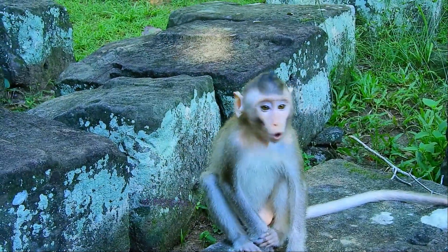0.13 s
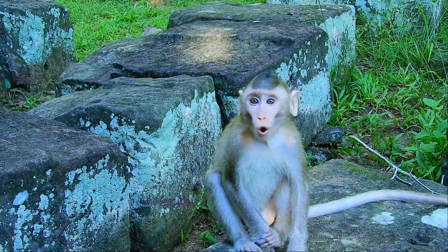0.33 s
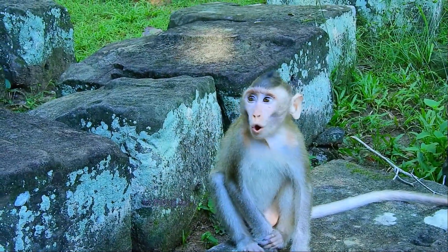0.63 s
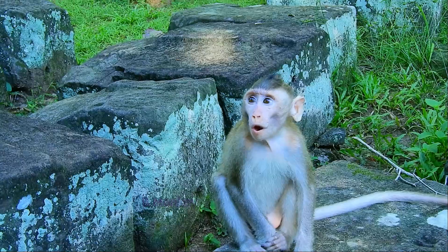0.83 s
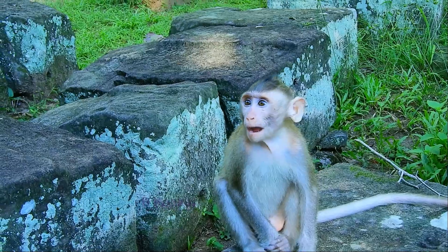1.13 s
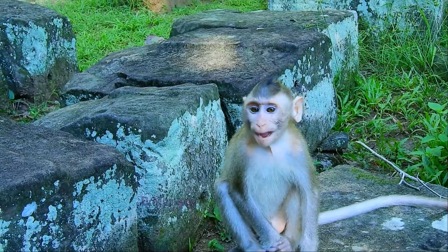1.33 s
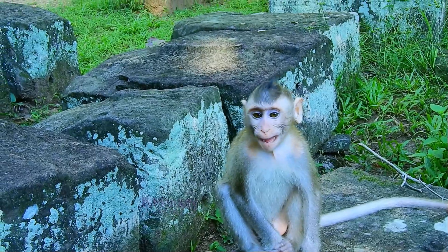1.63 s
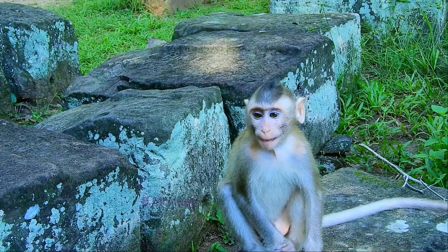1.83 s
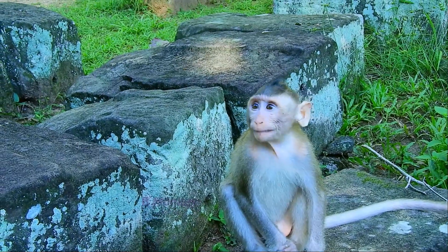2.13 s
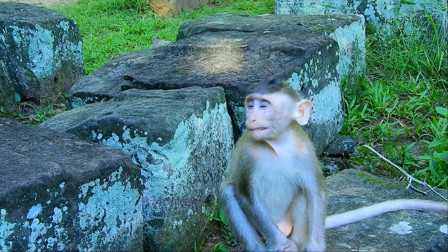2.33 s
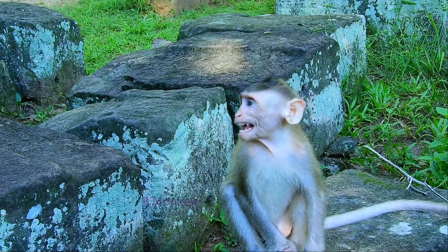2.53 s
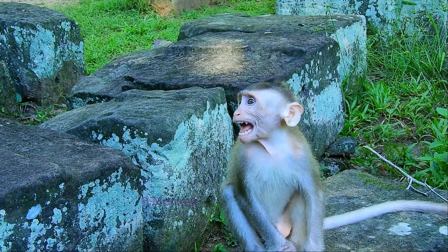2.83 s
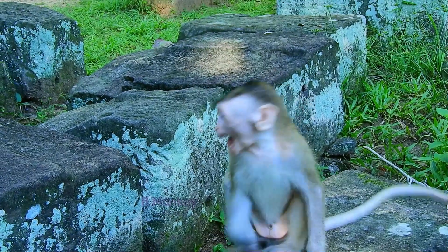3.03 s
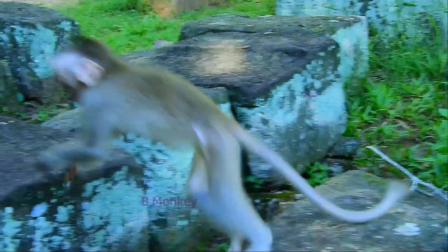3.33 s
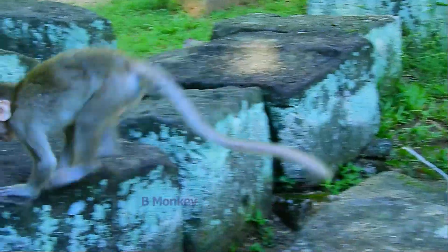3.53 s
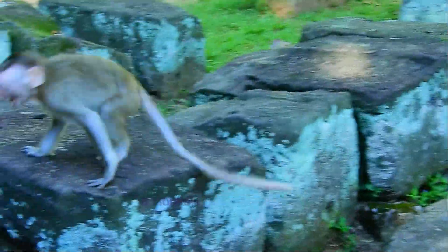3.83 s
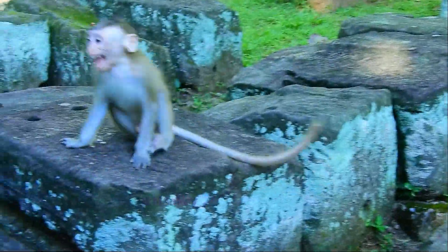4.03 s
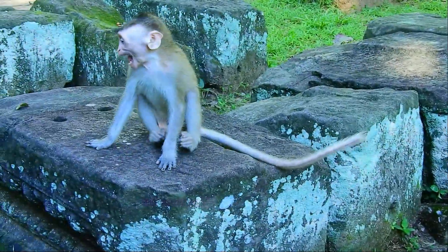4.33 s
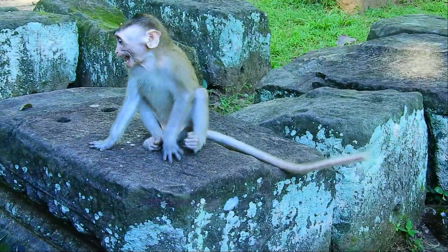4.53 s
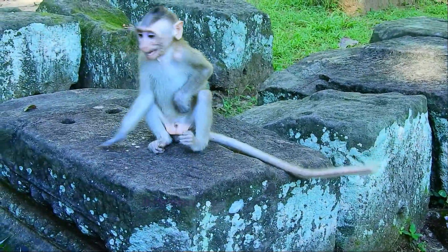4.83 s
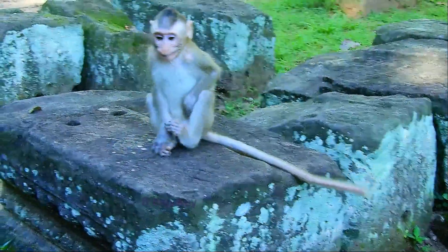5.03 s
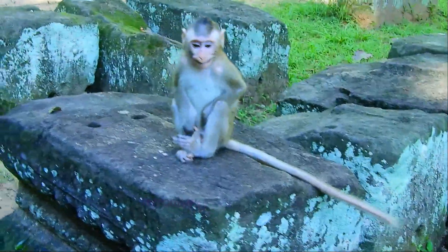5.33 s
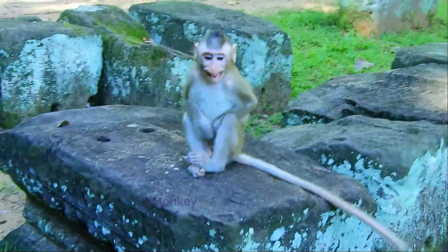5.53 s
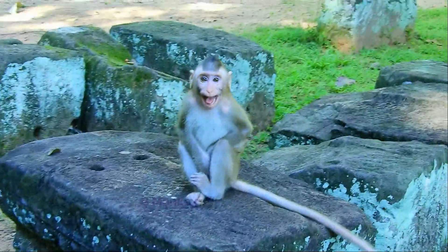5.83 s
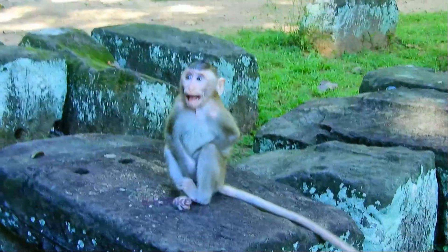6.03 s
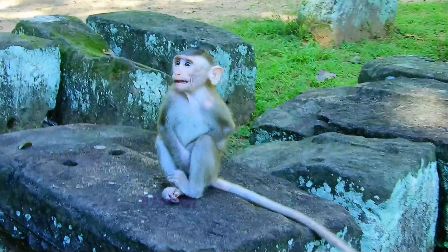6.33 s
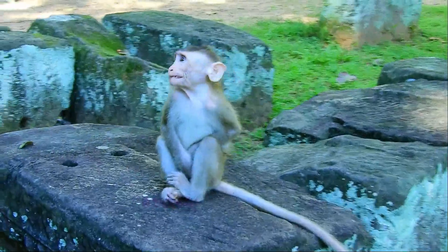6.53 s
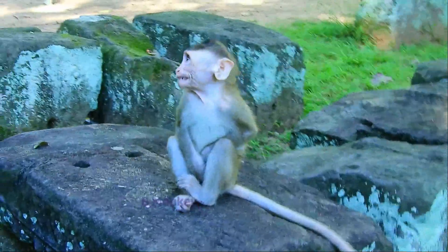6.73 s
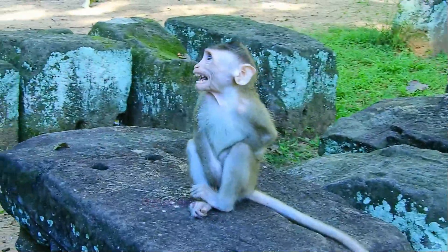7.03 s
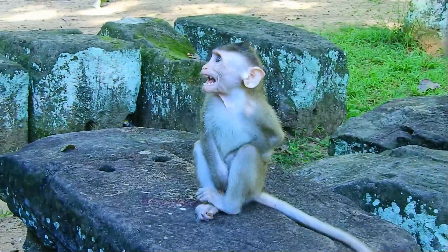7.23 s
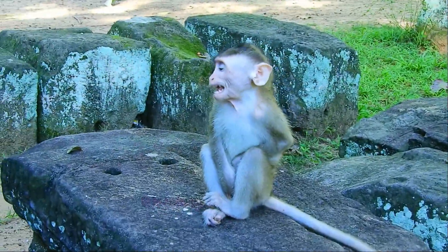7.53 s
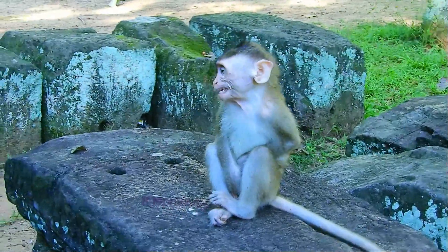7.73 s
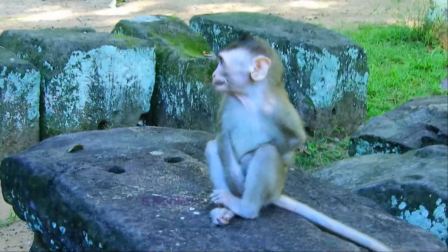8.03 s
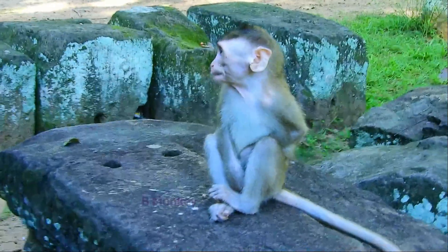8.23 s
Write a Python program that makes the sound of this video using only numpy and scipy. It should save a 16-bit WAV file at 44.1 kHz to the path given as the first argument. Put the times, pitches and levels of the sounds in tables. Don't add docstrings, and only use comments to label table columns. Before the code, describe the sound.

Outdoor close pickup of a small monkey on stone. A gentle, steady coo of under a second comes first, then soft chirps. Two adjacent bouts of piercing, cracking squeals follow, full of gusty noise, ending in a bright falling chirp. After a quiet gap with light scuffing comes a short rough-to-clear squeal, another lull, a faint rising chirp and a cleaner arching squeal. Insects, breeze and a faint far engine continue underneath.

```python
import sys
import numpy as np
from scipy import signal
from scipy.fft import rfft, irfft
from scipy.io import wavfile
from scipy.ndimage import uniform_filter1d

SR = 44100
rng = np.random.default_rng(int(sys.argv[2]) if len(sys.argv) > 2 else 0)


def to_wav(s):
    ch = np.atleast_2d(s).T
    pcm = np.round(np.clip(ch, -1, 1) * 32767)
    wavfile.write(sys.argv[1], SR, pcm.astype(np.int16))


def to_linear_factor(level_db):
    exponent = np.asarray(level_db, float) / 20
    return 10 ** exponent


N = 369538
TIME = np.arange(N) / SR


def at_hz(points, hz):
    point_hz, point_db = np.transpose(points)
    return np.interp(np.log(hz), np.log(point_hz), point_db)


def played(tables, fade_s):
    s, *columns = np.transpose(np.concatenate(tables))
    gate = np.zeros(N)
    for rows in tables:
        gate[round(rows[0][0] * SR):round(rows[-1][0] * SR) + 1] = 1
    gate = uniform_filter1d(gate, round(fade_s * SR) + 1, mode="nearest")
    return [gate] + [np.interp(TIME, s, column) for column in columns]


def notes(rows, arch, edge_db):
    out = []
    for s, length, from_hz, to_hz, db in rows:
        middle_hz = arch * np.sqrt(from_hz * to_hz)
        out.append([(s, from_hz, db + edge_db), (s + length / 2, middle_hz, db), (s + length, to_hz, db + edge_db)])
    return out


def wander(width_hz):
    step = int(np.clip(SR / 12 / width_hz, 1, 400))
    size = (N + SR) // step + 2
    z = rng.standard_normal(size) + 1j * rng.standard_normal(size)
    lowpass = signal.butter(4, max(width_hz, .2) / 2, fs=SR / step, output="sos")
    z = signal.sosfilt(lowpass, z)[SR // step:]
    z = np.interp(np.arange(N) / step, np.arange(len(z)), z)
    return z / np.sqrt(np.mean(np.abs(z) ** 2))


def turns(hz):
    return 2 * np.pi * np.cumsum(hz * np.ones(N)) / SR


def narrow_noise(hz, width_hz):
    return np.sqrt(2) * np.real(wander(width_hz) * np.exp(1j * turns(hz)))


# time in seconds, pitch in Hz, level in dB, unsteadiness in Hz.
FIRST_BOUT = [
    [(2.56, 2700, -44, 14), (2.579, 2800, -41, 13.3), (2.597, 3700, -39.5, 17.23),
     (2.612, 3850, -33.5, 17.2), (2.634, 4650, -22.5, 20.17), (2.652, 5150, -28.5, 24.73),
     (2.686, 6350, -18.5, 26.44), (2.72, 6780, -22, 27.12), (2.758, 6040, -32.5, 49.14)],
    [(2.759, 6040, -32.5, 49.96), (2.79, 6050, -31.5, 50.08), (2.826, 5580, -23, 28.02),
     (2.846, 5850, -25.5, 26.13), (2.866, 6550, -21, 27.96), (2.892, 7030, -20.5, 30),
     (2.92, 6550, -29.5, 59.88), (2.975, 6000, -29.5, 50.04), (3.004, 5530, -35, 67.93)],
    [(3.005, 5900, -29, 66), (3.022, 6750, -27.5, 64.68), (3.054, 7210, -26, 59.8),
     (3.082, 6180, -37, 96.97), (3.15, 5100, -39.5, 128)],
    [(3.151, 5110, -39, 110), (3.252, 6830, -35, 100), (3.3, 6500, -38, 120), (3.494, 6300, -40, 110),
     (3.534, 6910, -38.5, 108), (3.57, 6770, -31.5, 99.5), (3.598, 7140, -32, 94.18),
     (3.677, 6950, -31.5, 104.3), (3.72, 4340, -39.5, 112)],
]
SECOND_BOUT = [
    [(3.968, 5580, -30, 108.1), (3.992, 5810, -27.5, 72.22), (4.018, 7300, -19.5, 32.05),
     (4.072, 7700, -27, 36), (4.105, 7000, -31, 39.93), (4.14, 7200, -30, 44.88), (4.178, 6450, -30.5, 42),
     (4.198, 6730, -27, 43.98), (4.22, 5890, -29, 60)],
    [(4.221, 5900, -29, 61), (4.252, 6770, -26, 50.1), (4.275, 6650, -28, 55.04), (4.312, 7200, -28, 49.87),
     (4.345, 6850, -28.5, 60), (4.368, 6940, -28.5, 86.87), (4.41, 5740, -34, 104),
     (4.424, 4660, -56.5, 104)],
]
THIRD_BOUT = [
    [(5.558, 4009, -33, 55), (5.585, 5126, -29, 55), (5.602, 6283, -25, 56.58), (5.625, 6834, -24, 49.32),
     (5.67, 6502, -33.5, 70), (5.7, 6676, -31, 48.1), (5.74, 6339, -24.5, 28.7), (5.774, 6293, -19, 11.977)],
    [(5.775, 6297, -18.5, 14.35), (5.829, 7066, -26, 11.03), (5.858, 7292, -15, 11), (5.88, 7125, -24, 11),
     (5.896, 6511, -28, 14.596), (5.92, 6174, -25, 13.39), (5.934, 5827, -23, 13.87),
     (5.951, 5748, -24.5, 14), (5.964, 4454, -33.5, 40)],
]
FOURTH_BOUT = [
    [(6.972, 4500, -58, 12), (6.992, 5400, -50, 10.196), (7.0, 5315, -27, 9.116),
     (7.025, 5398, -20.5, 9.117), (7.051, 6272, -21, 9.384), (7.083, 6498, -18, 9.5),
     (7.122, 5950, -17, 10.5), (7.136, 6120, -16, 10.5), (7.152, 5900, -15.5, 11), (7.176, 6170, -15, 11)],
    [(7.177, 6170, -15, 11), (7.205, 5600, -19, 11), (7.222, 5200, -24, 11.206), (7.239, 5049, -24, 11.5)],
    [(7.24, 5051, -23.5, 11.5), (7.275, 5980, -14.5, 11.5), (7.321, 6516, -18, 11.5),
     (7.353, 6253, -19.5, 11.5), (7.37, 5744, -24.5, 18.99), (7.4, 5347, -26.5, 20.64),
     (7.429, 4850, -26, 22.63), (7.449, 3750, -28.5, 23)],
]
# start in seconds, length in seconds, from Hz, to Hz, level in dB.
SECOND_OSCILLATOR = [(2.68, 0.10318, 3530, 3559, -54.5), (2.958, 0.09028, 3726, 3709, -33),
                     (3.05, 0.45904, 3831, 3690, -43.5), (3.512, 0.20468, 3638, 3551, -38),
                     (3.964, 0.13723, 3921, 3599, -29), (4.102, 0.09523, 3565, 3330, -40.5),
                     (4.21, 0.03478, 2900, 2950, -51.5), (4.255, .055, 2991, 3454, -41.5),
                     (4.311, 0.03554, 3450, 3100, -41), (4.35, .06, 3588, 3506, -48.5),
                     (5.56, .06, 2700, 3397, -48), (5.621, 0.1305, 3404, 3992, -45.5),
                     (5.965, 0.02991, 3750, 3799, -48), (6.02, 0.08396, 3795, 3902, -51),
                     (7.365, 0.05, 3804, 3706, -42)]
# time in seconds, sum tone relative to the whistle in dB.
COUPLING = [(2.7, -21), (2.93, -17), (3.05, -6), (3.45, 1.0249), (3.6, -8.5), (4.02, -10.5), (4.11, -4.5),
            (4.23, 3), (4.3, -4.5), (5.55, 2.5), (5.63, -5.5), (5.74, -28), (5.87, -29.5), (7.0, -34.5),
            (7.38, -31.5)]
# frequency in Hz, level in dB.
THROAT = [(5000, -16), (7000, 2.5), (8500, -2.5), (10300, -7.5), (12000, -22), (13500, -25), (14600, -24.5),
          (15300, -38)]


def squeals():
    bouts = FIRST_BOUT + SECOND_BOUT + THIRD_BOUT + FOURTH_BOUT
    gate, hz, level_db, wobble_hz = played(bouts, fade_s=0.00462)
    voiced, low_hz, low_db = played(notes(SECOND_OSCILLATOR, arch=1.001, edge_db=-1.5), fade_s=0.01465)
    mixing = to_linear_factor(played([COUPLING], fade_s=0)[1]) * np.clip((hz - low_hz) / 1000 - 1, 0, 1)

    hz = uniform_filter1d(hz, 450)
    phase = turns(hz + wobble_hz * (2.5 * wander(500).real + wander(60).real))
    low = turns(low_hz + wobble_hz * (1.5 * wander(400).real + wander(60).real))

    def broken():
        shake_db = wobble_hz * (.04 * wander(250).real + .05 * wander(40).real)
        return to_linear_factor(shake_db + 1.6 * wander(70).real)

    def overtone(k):
        slope_db = 3 + np.maximum(k * hz - 11500, 0) / 150
        below_top = np.clip((.35 * SR - k * hz) / 500, 0, 1)
        return to_linear_factor(at_hz(THROAT, k * hz) - slope_db * (k - 2)) * np.sin(k * phase) * below_top

    whistle = broken() * (np.sin(phase) + sum(overtone(k) for k in (2, 3, 4)))
    below_top = np.clip((14600 - hz - 2 * low_hz) / 300, 0, 1)
    weak_mixes = np.sin(phase - low) + to_linear_factor(-12) * below_top * np.sin(phase + 2 * low)
    mixes = broken() * mixing * (np.sin(phase + low) + to_linear_factor(5 - .45 * wobble_hz) * weak_mixes)
    level_db = np.minimum(level_db, -15.5)
    alone = voiced * broken() * to_linear_factor(low_db) * np.sin(low)
    return np.sqrt(2) * (gate * to_linear_factor(level_db) * (whistle + mixes) + alone)


# from seconds, to seconds.
DISORDER = [
    (2.712, 2.835),
    (2.865, 3.718),
    (3.97, 4.195),
    (4.21, 4.44),
    (5.552, 5.768),
    (5.88, 5.903),
    (5.912, 5.938),
    (7.355, 7.421),
]
# peak in seconds, seconds to fall 10 dB each way,
# upper resonance in Hz, upper level in dB, lower level in dB.
PUSHES = [(2.795, 0.0949, 8650, -18.5, -31.5), (2.879, 0.0837, 9100, -19.5, -32),
          (2.993, 0.0402, 8710, -16.5, -24), (3.11, 0.0934, 8960, -27.5, -36.5),
          (3.18, 0.0967, 8880, -22.5, -32.5), (3.35, 0.2461, 9450, -31, -35),
          (3.522, 0.1872, 9710, -27, -40.5), (3.67, 0.2027, 9000, -34.5, -35),
          (3.975, 0.0388, 9200, -20, -22.5), (4.008, 0.0078, 9280, -18, -31),
          (4.11, 0.0066, 9600, -34.5, -42.5), (4.182, 0.0246, 9400, -18.5, -33.5),
          (4.235, 0.0576, 9250, -20.5, -30), (4.372, 0.0432, 9450, -23, -30.5),
          (4.428, 0.0017, 9350, -20.5, -20.5), (5.588, 0.0576, 8980, -23, -31),
          (5.66, 0.04, 9020, -29, -33), (5.746, 0.0661, 8370, -20, -31.5),
          (5.905, 0.0831, 8500, -21, -30.5), (7.362, 0.1382, 8650, -20.5, -31.5),
          (7.422, 0.1059, 8860, -23.5, -47.5)]


def chaos():
    gate, = played([[(start,), (end,)] for start, end in DISORDER], fade_s=0.00417)
    peak_s, fall_s, push_hz, upper_db, lower_db = np.transpose(PUSHES)
    tents = to_linear_factor(-20 * np.abs(TIME[:, None] - peak_s) / fall_s)
    upper_gain = np.sqrt(tents @ to_linear_factor(2 * upper_db))
    lower_gain = np.sqrt(tents @ to_linear_factor(2 * lower_db))
    slaps = to_linear_factor(2.5 * wander(900).real + .8 * wander(150).real)

    def streak(centre_hz, width_hz, db, stray_hz):
        patch_db = 2.383 * wander(132.7).real + 2.3476 * wander(45.65).real + 2.243 * wander(12.644).real
        return to_linear_factor(db + patch_db) * narrow_noise(centre_hz + stray_hz * wander(30).real, width_hz)

    hz = np.interp(TIME, peak_s, push_hz)
    upper = (streak(hz - 500, 754.5, -2.0825, 350)
             + streak(hz + 600, 989.8, -3.5, 350)
             + streak(hz, 4541, -8, 200)
             + streak(6000, 3890, -11, 300)
             + streak(hz - 1500, 593.2, -10, 400)
             + streak(5600, 688.4, -13, 500)
             + streak(12300, 2836, -17, 400)
             + streak(14300, 2000, -42, 330))
    low_hz = played(notes(SECOND_OSCILLATOR, arch=0.9976, edge_db=0), fade_s=0)[1].clip(3400)
    lower = (streak(low_hz + 720, 460, -4, 250)
             + streak(low_hz + 80, 382.4, -4.0, 99.959)
             + streak(low_hz - 650, 293, -9.5, 250)
             + streak(2600, 400.1, -13.5, 119.9)
             + streak(1900, 799, -19.5, 199.6)
             + streak(low_hz + 300, 2186, -11, 300)
             + streak(low_hz + 1400, 487, -10.5, 350))
    return gate * slaps * (to_linear_factor(-4.5) * upper_gain * upper + to_linear_factor(-6.0) * lower_gain * lower)


# time in seconds, pitch in Hz, level in dB, mouth opening from 0 to 1.
COO = [
    (0.0, 750.9, -41, 0.62),
    (0.068, 755.4, -34.5, 0.04),
    (0.216, 765.5, -34, 0.2),
    (0.254, 776.1, -35, 0.48),
    (0.392, 795.1, -32.5, 0.43),
    (0.526, 773.4, -34.5, 0.56),
    (0.59, 805.4, -33, 0.96),
    (0.748, 802.4, -35, 0.97),
    (0.783, 717.3, -52, 0.26),
]
# multiple of the pitch, level in dB.
COO_ORDERS = [(1, 10.5), (2, -2.5), (3, -15.5), (4, -15), (5, -12), (6, -15), (7, -14.5), (8, -32),
              (9, -18.5), (10, -9), (11, -3), (12, -9), (13, -25.5), (14, -23.5), (15, -42.5), (16, -37)]


def coo():
    gate, hz, level_db, mouth = played([COO], fade_s=0.011)
    phase = turns(uniform_filter1d(hz, 600) * (1 + 0.003943 * wander(35.844).real))
    upper = 0
    for k, db in COO_ORDERS[2:]:
        upper += to_linear_factor(db + 2.629 * wander(44.068).real) * np.sin(k * phase + k * k)
    upper_db = -11 + 4.5 * np.clip(mouth / 0.2904, 0, 1)
    octave_db = -26.5 + 30 * mouth
    stack = to_linear_factor(-2) * np.sin(phase) + to_linear_factor(octave_db) * np.sin(2 * phase) + to_linear_factor(upper_db) * upper
    return np.sqrt(2) * gate * to_linear_factor(level_db) * stack


# start in
# seconds, length in seconds, from Hz, to Hz, level in dB.
CHIRPS = [
    (1.455, 0.055, 720, 980, -48),
    (1.518, 0.034, 1000, 780, -39.5),
    (1.71, 0.04, 800, 826, -52.5),
    (4.405, 0.035, 4210, 2265, -27.5),
    (4.655, 0.05, 814.5, 825, -51),
    (6.808, .028, 1449, 1300, -43.5),
    (6.845, .032, 1798, 2900, -42.5),
    (6.882, 0.030257, 3100, 3698, -41.5),
    (7.435, 0.02, 2850, 2210, -36),
]
CHIRP_TOP = [
    (6.812, 0.01464, 4423, 4300, -42),
    (6.835, 0.0336, 4395, 4994, -43.5),
    (6.875, 0.01489, 5218, 6018, -45),
]


def chirps():
    gate, hz, level_db = played(notes(CHIRPS, arch=1.09, edge_db=-8.5), fade_s=0.02114)
    phase = turns(uniform_filter1d(hz, 600) * (1 + .03 * wander(200).real))
    out = gate * to_linear_factor(level_db) * (np.sin(phase) + to_linear_factor(-15.5) * np.sin(2 * phase))
    gate, hz, level_db = played(notes(CHIRP_TOP, arch=0.9816, edge_db=-3), fade_s=0.01217)
    out += gate * to_linear_factor(level_db) * np.sin(turns(hz + 120 * wander(289.3).real))
    return np.sqrt(2) * out


# delay in seconds, left level in dB, right level in dB.
ECHOES = [(.00012, -19, -20), (.00032, -50.5, -26.5), (.0021, -8, -69.5), (.0047, -71.5, -9.5),
          (.011, -18, -78), (.017, -53.5, -29.5), (.029, -38, -59.5)]
WALL_BAND_HZ = [2200, 15500]


def stones(voice):
    t = TIME[:SR // 2]
    scatter = to_linear_factor(-24.5 - 60 * t / 0.026) * (t > .0005)
    long_tail = to_linear_factor(-44.5 - 60 * t / 0.3003) * (t > .01)
    tail = rng.standard_normal((2, SR // 2)) * (scatter + long_tail)
    tail = signal.sosfilt(signal.butter(2, WALL_BAND_HZ, "band", fs=SR, output="sos"), tail)
    for delay, left_db, right_db in ECHOES:
        tail[:, round(delay * SR)] += to_linear_factor(np.array([left_db, right_db]))
    return signal.fftconvolve(voice[None], tail, axes=1)[:, :N]


# start in seconds, length in seconds, centre in Hz, width in Hz, level in dB.
SCUFFS = [(0.535, 0.01788, 1200, 410, -42), (0.551, 0.1787, 1393, 550.3, -49.5),
          (1.193, 0.1987, 2696, 230, -56.5), (2.411, 0.09813, 772, 170.2, -53),
          (4.902, 0.01159, 3300, 1400, -46.5), (4.91, 0.01238, 6197, 2500, -42.5),
          (4.967, 0.05965, 228.5, 83.9, -49), (5.19, 0.053, 259.9, 80, -55.5),
          (5.332, 0.2208, 5822, 900, -53.5), (5.381, 0.3257, 1521, 700, -51.5),
          (5.815, 0.19202, 1520, 560.3, -40), (6.419, 0.12486, 1142, 459.6, -50),
          (6.574, 0.0302, 9467, 1499, -48), (7.784, 0.0739, 1444, 859.7, -49.5),
          (7.781, 0.2282, 3495, 250, -54), (7.8, 0.1101, 761.7, 100, -57),
          (8.058, 0.1079, 1740, 450, -50.5), (8.06, 0.10525, 768.4, 90.03, -51.5)]
RASPS = [(1.501, 0.0445, 9295, 470, -50.5), (2.574, 0.00847, 9205, 1100, -40.5),
         (2.72, .08, 14700, 800, -54), (2.92, .12, 14900, 700, -51), (4.412, .035, 2700, 1200, -31),
         (5.58, .19, 14300, 1100, -51), (3.958, .015, 4000, 496.5, -33.5),
         (4.208, 0.02374, 4238, 250, -34.5), (5.549, 0.03592, 6300, 500, -31.5),
         (5.752, 0.03661, 9502, 199.9, -27.5), (5.752, .036, 8021, 249.8, -30),
         (5.894, 0.02123, 8494, 200, -22), (5.938, .07, 4207, 1100, -41),
         (5.969, 0.04948, 8719, 1000, -38.5), (6.809, 0.05906, 8602, 1200, -48),
         (7.1, 0.04948, 9049, 150, -40), (7.429, 0.015, 6852, 3002, -40), (7.45, 0.10534, 5375, 1000, -41),
         (7.452, 0.09234, 8600, 660, -39.5)]


def scuffs_and_rasps():
    out = np.zeros((2, N))
    for s, length, hz, width_hz, db in SCUFFS + RASPS:
        i, n = round(s * SR), round(length * SR)
        sos = signal.butter(2, [max(hz - width_hz, 100), hz + width_hz], "band", fs=SR, output="sos")
        grains = rng.standard_normal((2, SR // 2)) * rng.exponential(1, SR // 2)
        mid, side = signal.sosfilt(sos, grains)[:, :n]
        rub = (mid + 0.3413 * side * [[1], [-1]]) / np.std(mid)
        out[:, i:i + n] += to_linear_factor(db) * signal.windows.tukey(n, .6) * rub
    return out


# centre in Hz, width in Hz, level in dB, throb in dB.
INSECTS = [(5200.6, 361, -58.5, 3.5), (6482.6, 27, -61, 2), (7030, 25.256, -52.5, -0.5),
           (7121.7, 71.34, -48.5, 0.5), (7428, 74.2, -67, -2), (8609.8, 231.6, -63, 2)]
THROB_HZ = [10.6, 56.457]


def insects():
    out = np.zeros((2, N))
    beat = sum(np.sin(turns(hz * (1 + 0.01785 * wander(0.9844).real))) for hz in THROB_HZ)
    for hz, width_hz, db, throb_db in INSECTS:
        mid, side = narrow_noise(hz, width_hz), narrow_noise(hz, width_hz)
        level_db = db + np.clip(throb_db, 0, 3) * beat + 1.417 * wander(0.32385).real
        out += to_linear_factor(level_db) * (mid + 0.5688 * side * [[1], [-1]])
    return out


# frequency in Hz, width in Hz, level in dB.
HUM = [(51.358, 0.7776, -43.5), (103.85, 2.8237, -50)]


def engine():
    out = np.zeros(N)
    for hz, width_hz, db in HUM:
        swell = 1 + 0.3143 * wander(width_hz * 8)
        line = np.exp(1j * turns(hz + width_hz * wander(1.4331).real))
        out += to_linear_factor(db) * np.sqrt(2) * np.real(swell * line)
    return out


# frequency in Hz, level in dB per Hz.
AIR = [(20, -19), (40, -17), (90, 0.5), (130, -3.5), (200, -12), (280, -21.5), (1400, -24.5), (3000, -28.5),
       (5200, -25.5), (7000, -23), (8200, -32), (11000, -37.5), (11900, -51), (13500, -51), (15500, -60)]
# frequency in Hz, side minus mid in dB.
AIR_SIDE = [(60, -5.5), (110, -21.5), (200, -7.5), (380, -4.5), (700, -6), (1290, -7.5), (2380, -5),
            (4400, -5.5), (8120, 0.5), (15000, 1)]
# time in seconds, level
# in dB.
BREEZE = [(0, -2), (1.2, 0), (1.9, -3.5), (2.1, 1.5), (2.6, -0.5), (3.2, -8), (4.3, -2), (4.7, -7.5),
          (5.3, -4.5), (5.7, 5), (6.2, 1.5), (6.9, 6.5), (7.6, 3.5), (8.38, -2)]
# level in calm in dB, share of the breeze.
BREEZE_REACH = [(-3, 0.3773), (-0.0681, 1.0172), (1.5, 0.2156)]


def air():
    hz = np.maximum(np.fft.rfftfreq(N, 1 / SR), 1)
    colour = to_linear_factor(at_hz(AIR, hz)) * np.array([hz ** 0, to_linear_factor(at_hz(AIR_SIDE, hz))])
    noise = rfft(rng.standard_normal((2, N))) * colour / np.sqrt(np.mean(colour[0] ** 2))
    _, breeze_db = played([BREEZE], fade_s=0)
    above = [1] + [hz ** 6 / (hz ** 6 + edge ** 6) for edge in (450, 1500, 4200)] + [0]
    gains = [to_linear_factor(1.5 * wander(5).real)]
    for db, share in BREEZE_REACH:
        gains.append(to_linear_factor(db + share * breeze_db + 1.4 * wander(6).real))
    mid, side = sum(gain * irfft(noise * (above[k] - above[k + 1]), N) for k, gain in enumerate(gains))
    return to_linear_factor(-43) * (mid + side * [[1], [-1]])


# time in seconds, left minus right in dB.
PAN = [(0, -5), (.8, -3), (2.6, 0), (3.0, -1), (3.7, 0), (4.4, 0.5), (5.6, -1), (6.0, -0.5), (7.0, 4.5),
       (7.5, -1.5), (8.38, 0)]


def scene():
    _, pan_db = played([PAN], fade_s=0)
    voice = squeals() + chaos() + coo() + chirps()
    monkey = voice * to_linear_factor(np.array([pan_db / 2, -pan_db / 2])) + stones(voice)
    hum = engine() * to_linear_factor(np.array([[-.7], [.7]]))
    return monkey + scuffs_and_rasps() + insects() + hum + air()


def band_limit(x):
    return signal.sosfilt(signal.butter(12, 15730, fs=SR, output="sos"), x)


def record(dry):
    mix = dry - .0015
    return band_limit(mix)


dry = scene()
out = record(dry)
to_wav(out)
```